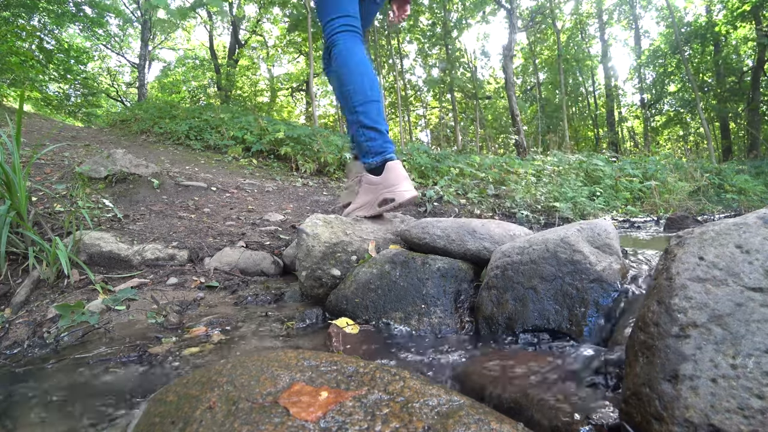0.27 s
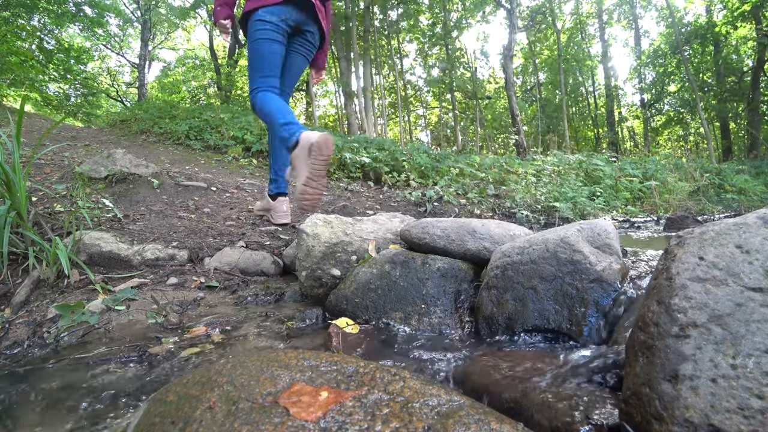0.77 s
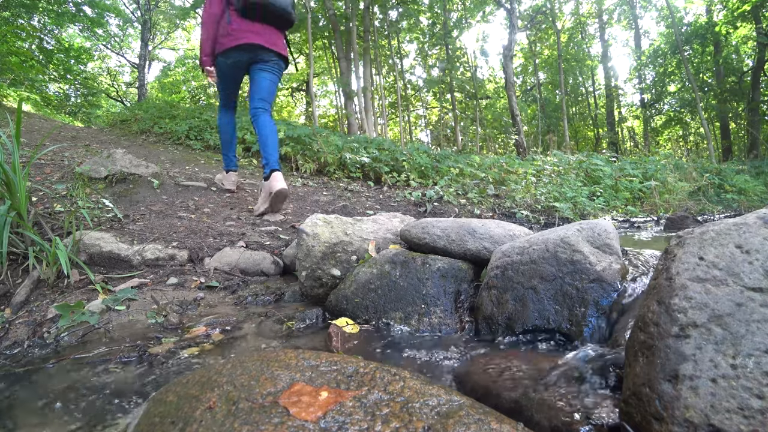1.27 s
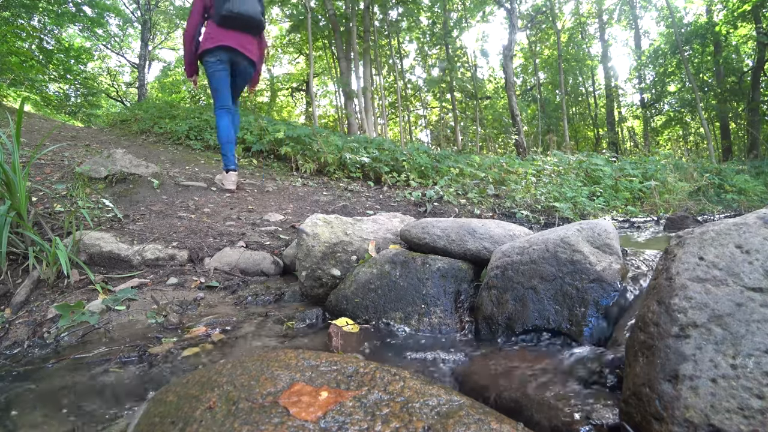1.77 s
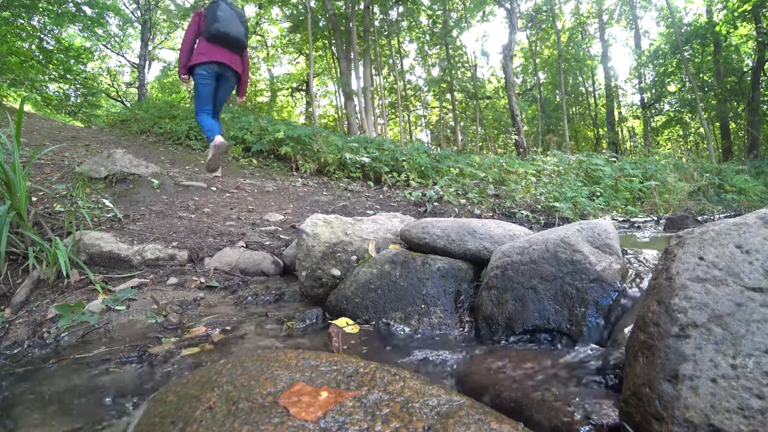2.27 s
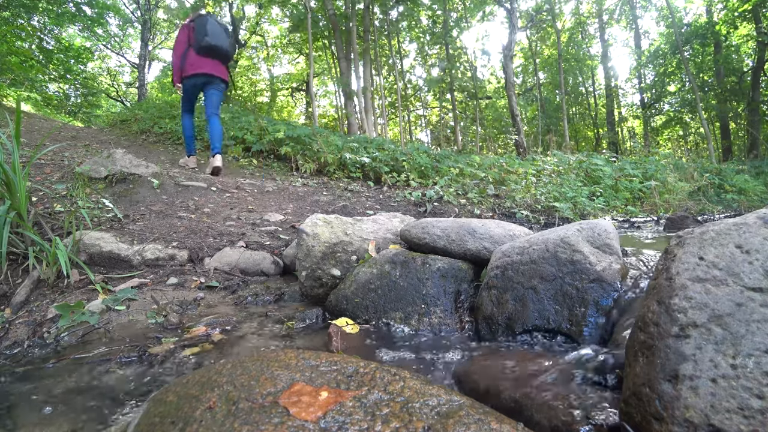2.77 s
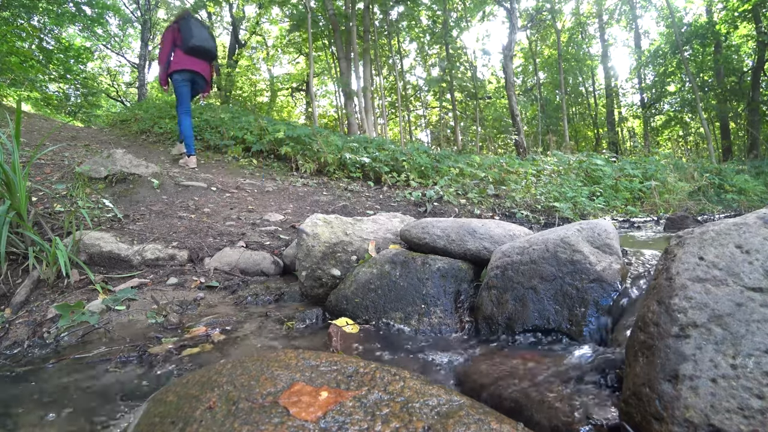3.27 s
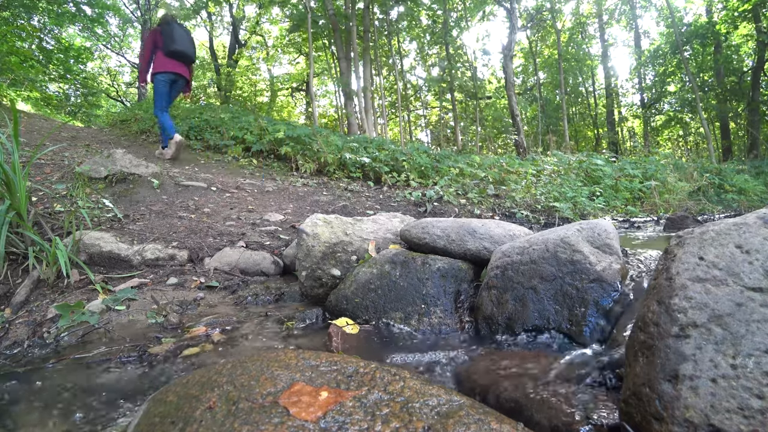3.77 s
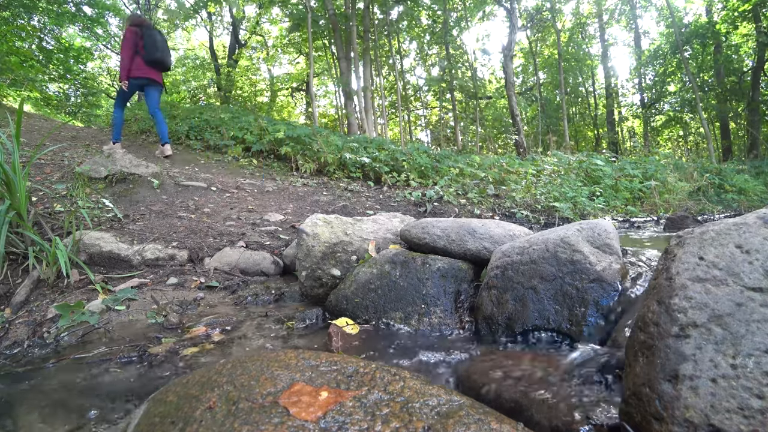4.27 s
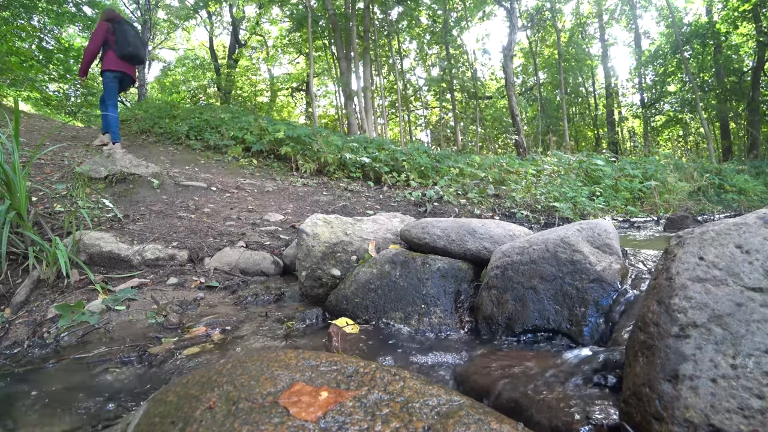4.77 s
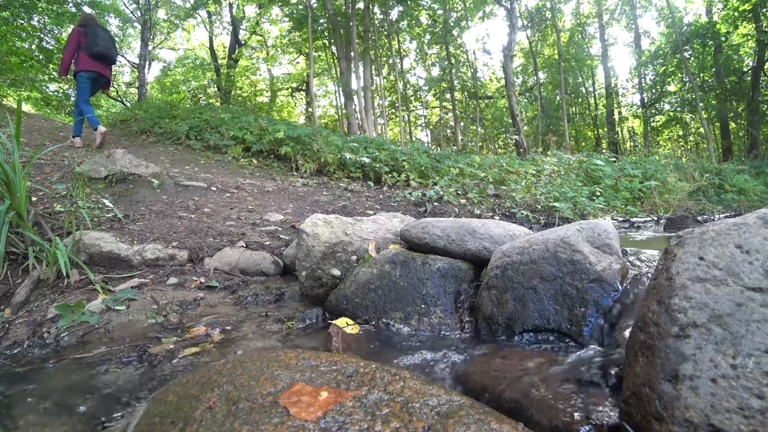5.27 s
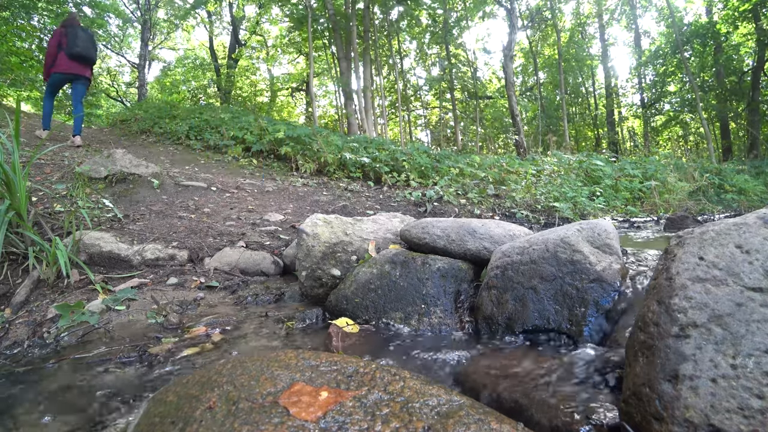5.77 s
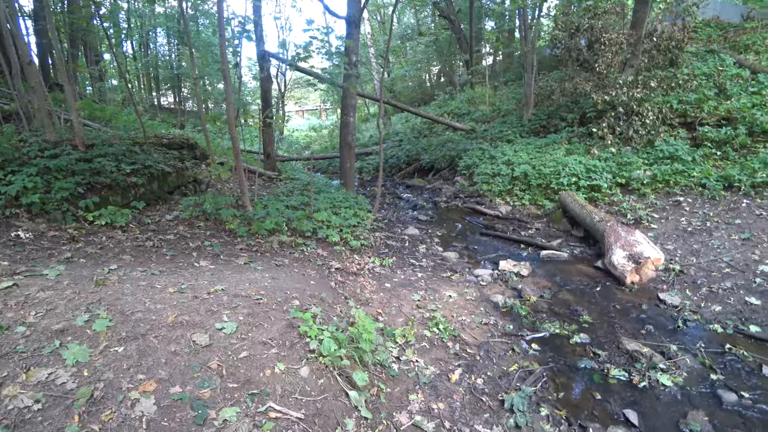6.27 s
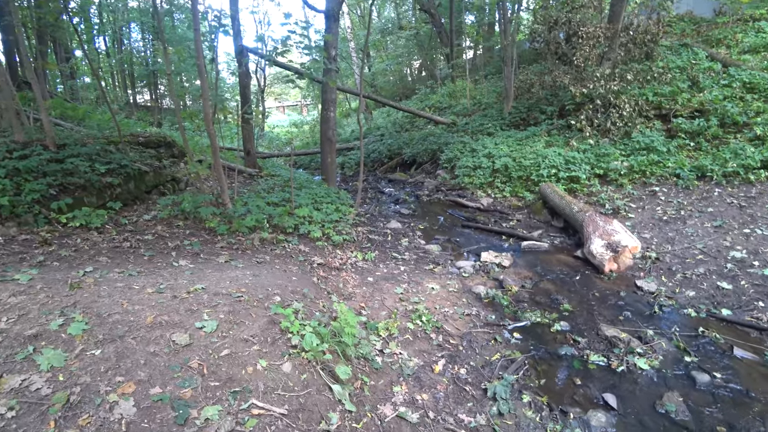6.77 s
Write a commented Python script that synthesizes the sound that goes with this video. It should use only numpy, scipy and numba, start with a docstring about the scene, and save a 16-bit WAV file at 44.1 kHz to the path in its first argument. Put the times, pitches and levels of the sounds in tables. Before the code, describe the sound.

A small microphone sits right at the water among stones. Lively, high, glassy plips and fine fizzing trickle run continuously, dotted with low short gurgles and sharp ticks, over a very faint droning far engine. After six seconds the sound drops abruptly to a wide, dull, steady hush of far traffic and leaves, with faint low rumble and a few light drips from the now distant stream. No footsteps are heard.

```python
"""Forest stream beside the listener, then up the bank

A thin stream trickles over stones close by, a little to the right: trapped bubbles ring and rise in pitch,
hollow glugs sound, drops tick, stones echo them and a far engine hums. Each bubble is a damped sine.
At MOVE_S the listening place jumps some metres up the bank, where filtered noise gives far traffic hush and
low rumble, with a faint trickle and three drips."""
import sys
import numpy as np
from scipy import signal
from scipy.fft import rfft, irfft
from scipy.io import wavfile
from scipy.ndimage import uniform_filter1d
from numba import njit

SR = 44100
rng = np.random.default_rng(int(sys.argv[2]) if len(sys.argv) > 2 else 0)


def file_out(sig):
    """Save sig as 16-bit WAV at sys.argv[1]."""
    # one column per channel
    cols = np.atleast_2d(sig).T
    # limit, then scale
    lim = np.clip(cols, -1, 1)
    pcm = np.round(lim * 32767).astype(np.int16)
    wavfile.write(sys.argv[1], SR, pcm)


N = 310023
MOVE_S = 6.162


def undb(db):
    """Decibels are logarithmic: the amplitude gain of a dB value."""
    return 10 ** (np.asarray(db) / 20)


def level(x, db):
    """Root-mean-square amplitude measures power: scale to an rms level."""
    return x * undb(db) / np.sqrt(np.mean(x ** 2))


def curve(table, axis):
    """Linear interpolation in time: one column of a time table at every sample."""
    rows = np.array(table)
    return np.interp(np.arange(N) / SR, rows[:, 0], rows[:, axis])


def colour(table, hz):
    """Interpolation over log frequency: dB of a spectrum table at these frequencies."""
    rows = np.array(table)
    return np.interp(np.log(hz), np.log(rows[:, 0]), rows[:, 1])


def walk(rate):
    """Slow random modulation: levels held 1 / rate s and slewed twice; spread near 1."""
    k = int(SR / rate)
    held = np.repeat(rng.standard_normal(N // k + 1), k)
    return 1.98 * uniform_filter1d(uniform_filter1d(held, k), k)[:N]


PARK_DB = -42  # before the gain of either listening place
# Spectral density of the park's hush; columns: frequency_hz [Hz], level_db [dB per Hz, relative]
PARK_SPECTRUM = [(18, -3), (30, 2), (60, 3), (140, -7.5), (230, -12), (600, -10), (850, -9), (1050, -5.5),
                 (1350, -11), (2200, -17.5), (3200, -18.5), (6000, -26.5), (12000, -32.5), (16000, -29)]


def park():
    """Partly coherent noise: far traffic and leaves, alike left and right in the bass only."""
    hz = np.maximum(np.arange(N // 2 + 1) * SR / N, 10)
    gain = undb(colour(PARK_SPECTRUM, hz))
    side_share = np.clip((hz / 260) ** 2, 0, .6)
    mid = irfft(rfft(rng.standard_normal(N)) * gain, N)
    side = irfft(rfft(rng.standard_normal(N)) * gain * side_share, N)
    return level(np.array([undb(-1.0) * (mid + side), mid - side]), PARK_DB)


def rumble():
    """Band-limited noise: low traffic rumble."""
    band = signal.butter(2, (70, 210), "band", fs=SR, output="sos")
    return level(signal.sosfilt(band, rng.standard_normal(N)), -57.5)


ENGINE_SECOND_DB = -57  # mean level of the octave
HUM_HZ, HUM_DB = 51.6, -53.5  # just below the engine, beating with it; mean level
ENGINE_FADES_PER_S, ENGINE_STEADY = 12, 6.9  # rate of scattered paths; weight of the steady one
# Firing rate of the far engine, before a slight waver; columns: start_s [s], pitch_hz [Hz]
ENGINE_RATE = [(0, 59.1), (2.6, 58.65), (3.6, 54.23), (6.16, 55.4)]
# Its low tone swells and sinks; columns: start_s [s], level_db [dB rms, before path fading]
ENGINE_LEVEL = [(0.1, -52), (0.35, -44), (0.8, -44), (0.9, -56), (1.25, -42), (1.45, -52), (2.4, -44),
                (2.55, -48), (2.7, -40), (2.9, -48), (3.55, -50.5), (3.75, -47), (6.05, -46.5)]


def engine():
    """Multipath fading: a firing tone beats with its scattered paths, beside its octave and a nearby hum."""
    phase = 2 * np.pi * np.cumsum(curve(ENGINE_RATE, axis=1) + 0.18 * walk(8.25)) / SR
    # scattered paths through the trees beat against the steady one
    scattered = walk(ENGINE_FADES_PER_S) + 1j * walk(ENGINE_FADES_PER_S)
    paths = (ENGINE_STEADY + scattered) / np.sqrt(2 + ENGINE_STEADY ** 2)
    firing = undb(curve(ENGINE_LEVEL, axis=1)) * np.imag(paths * np.exp(1j * phase))
    octave = undb(ENGINE_SECOND_DB + 2.1 * walk(9)) * np.sin(2 * phase)
    hum = undb(HUM_DB + 1.2 * walk(2.8)) * np.sin(2 * np.pi * HUM_HZ * np.arange(N) / SR)
    return np.sqrt(2) * (firing + octave + hum)  # sine peak for a given rms


# Resonances of hollows between the stones; columns: pitch_hz [Hz], width_hz [Hz], level_db [dB]
STONE_HOLLOWS = [(512, 74, -12), (905, 140, -9.5), (1620, 140, -10)]


def stones(x):
    """Resonance and diffuse reflection: deep bass drops out, hollows ring along, banks return brief treble."""
    t = np.arange(SR // 8) / SR
    # falls 60 dB in 6.7 ms, different at each ear
    tail = rng.standard_normal((2, len(t))) * np.exp(-np.log(1000) * t / 0.0067)
    tail /= np.sqrt(np.sum(tail ** 2, axis=1, keepdims=True))
    tail = signal.sosfilt(signal.butter(2, 5000, "high", fs=SR, output="sos"), tail)
    # small bubbles radiate no deep bass
    direct = signal.sosfilt(signal.butter(2, 210, "high", fs=SR, output="sos"), x)
    ringing = direct
    for hz, width_hz, db in STONE_HOLLOWS:
        hollow = signal.iirpeak(hz, hz / width_hz, fs=SR)
        ringing = ringing + undb(db) * signal.lfilter(*hollow, direct)
    return ringing + undb(-12.0) * signal.fftconvolve(ringing, tail, axes=1)[:, :N]


@njit
def ring(start, hz, cycles, rise, left, right, length, attack, phase0, overshoot):
    """Damped bubble oscillation: a jolt and strong first swing, then a fade as pitch climbs near the surface."""
    out = np.zeros((2, length))
    for e in range(len(start)):
        phase = phase0
        for i in range(min(int(6 * cycles[e] * SR / hz[e]), length - start[e])):
            turns = i * hz[e] / SR
            phase += 2 * np.pi * min(hz[e] * (1 + rise[e] * turns / cycles[e]) / SR, .45)
            swing = np.exp(-turns / cycles[e]) + overshoot * np.exp(-2 * turns)
            v = swing * (1 - np.exp(-i / attack[e])) ** 2 * np.sin(phase)
            out[0, start[e] + i] += left[e] * v
            out[1, start[e] + i] += right[e] * v
    return out


STONE_ECHO_MS, STONE_ECHO_DB = 2.2, -14  # typical delay, relative level
PINCH_MS, PINCH_PHASE, PINCH_OVERSHOOT = 0.027, 1, 0.053  # sudden start: rise, phase (rad), extra first swing
SWELL = 0.086  # the ring builds up over this share of its fading time beyond two cycles
# Mean place of the stream, below zero to the right; columns: pitch_hz [Hz], left_minus_right_db [dB]
STREAM_PLACE = [(250, 0), (600, -3), (2000, -4.5), (5000, -3), (12000, -2.5)]


def bubbles(s, db, hz, cycles, rise, spread_db, rise_scatter=0.58):
    """Level panning and reflection: a tick, one echo, a weaker lead-in just before, a later companion."""
    chance = rng.standard_normal((len(s), 12)).T
    # the finest droplets scatter wider than the big bubbles
    pan_db = colour(STREAM_PLACE, hz) + spread_db * chance[0] * (1 + (hz / 5000) ** 2)
    now = 0 * s
    delay_s = STONE_ECHO_MS / 1000
    echo = delay_s * np.exp(.5 * chance[1])
    later = delay_s * np.exp(.9 + .6 * chance[2])
    lead_in = delay_s * np.exp(-.4 + .6 * chance[3])
    tick_db = -10.5 + 7.5 * np.clip(chance[9], -3, 1.5)
    tick_hz = np.minimum(3500 + 1.68 * hz, 12000) * np.exp(0.29 * chance[10])
    tick_cycles = 0.98 * np.exp(0.62 * chance[11])
    # rows: bubble, echo, later companion, faint lead-in, tick of the neck pinching off
    lag = np.array([now, echo, later, -lead_in, now])
    drop_db = np.array([now, now + STONE_ECHO_DB, now - 13, now - 15 - 4000 / hz, tick_db])
    pitch = np.array([hz, hz, hz * np.exp(0.131 * chance[4]), hz * np.exp(0.266 * chance[5]), tick_hz])
    ringing = np.clip([cycles, cycles, 0.94 * cycles, cycles, tick_cycles], .3, 30)
    size = undb(db + drop_db) * np.sign(chance[4:9])
    left, right = size * undb(pan_db / 2), size * undb(-pan_db / 2)
    glide = np.tile(rise * np.exp(rise_scatter * chance[8]), len(lag))
    start = np.clip((s + lag) * SR, 0, N - 1).astype(np.int64)
    attack_s = PINCH_MS / 1000 + SWELL * np.maximum(ringing - 2, 0) / pitch
    return ring(start.ravel(), pitch.ravel(), ringing.ravel(), glide, left.ravel(), right.ravel(), N,
                attack_s.ravel() * SR, PINCH_PHASE, PINCH_OVERSHOOT)


# Drips that carry up to the bank; columns: start_s [s], level_db [dB], pitch_hz [Hz]
BANK_DRIPS = [(6.3999, -31, 3180), (6.55, -32, 1300), (6.812, -33, 2850)]


def far_drips():
    """Damped oscillation: single drips ring for a few cycles."""
    s, db, hz = np.array(BANK_DRIPS, float).T
    return bubbles(s, db, hz, 0 * s + 4.9, rise=0.044, spread_db=3.0)


# Loudness of a small bubble by its pitch; columns: pitch_hz [Hz], level_db [dB, relative]
BUBBLE_LOUDNESS = [(220, -22.5), (350, -18), (500, -4.5), (750, -5.5), (1000, 5), (1400, 2), (1800, 9.5),
                   (3000, 14), (4500, 11.5), (6500, 5.5), (8500, 0.5), (10000, 13.5), (14000, -14)]


def swarm(per_s, lo_hz, hi_hz, cycles, scatter_db, surge, rise=0.0607):
    """Random superposition: bunches of many faint small bubbles, a few larger, none huge; rms 1."""
    chance = rng.random((int(per_s * N / SR), 4)).T
    s = chance[0] * (N - 1) / SR
    hz = lo_hz * (hi_hz / lo_hz) ** chance[1]
    size_db = -scatter_db * np.log(chance[2] + 1e-9) + surge[(s * SR).astype(int)]
    db = colour(BUBBLE_LOUDNESS, hz) + np.minimum(size_db, 2.11 * scatter_db)
    ringing = cycles * 2.44 ** (2 * chance[3] - 1)
    return level(bubbles(s, db, hz, ringing, rise, spread_db=1.36), 0)


def trickle():
    """Summed bubble resonances: rings, spray ticks and low gurgles in quick shared spurts, over a fine fizz."""
    spurt = walk(45)
    spurt -= uniform_filter1d(spurt, SR // 14)  # the flow itself is steady
    bed = swarm(760, 218.9, 8985, cycles=3.44, scatter_db=4.0, surge=5.4 * spurt)
    spray = swarm(400, 2850, 14100, cycles=1.08, scatter_db=6.0, surge=3.0 * spurt)
    gurgle = swarm(45, 230, 642, cycles=1.33, scatter_db=5.0, surge=6.7 * spurt)
    fizz = swarm(2500, 1213, 12900, cycles=3.8, scatter_db=7.0, surge=2.5 * spurt)
    # a few bubbles ring long and sweep further upward as they rise
    singers = swarm(70, 416.7, 2472, cycles=5.7, scatter_db=3.0, surge=3.0 * spurt, rise=0.1135)
    # the tiniest bubbles ring briefly at one nearly steady high pitch
    pinpricks = swarm(160, 4440, 12350, cycles=3.7, scatter_db=6.0, surge=5.9 * spurt, rise=0.024)
    low = bed + undb(-13.0) * singers + undb(-14.0) * gurgle
    high = undb(-4.0) * spray + undb(-10.0) * pinpricks + undb(-8.5) * fizz
    return low + high


GLUG_CYCLES, TICK_CYCLES = 0.8, 1.29  # cycles to fade by 1/e
POCKET_DB, POCKET_CYCLES, POCKET_PITCH = -13, 2.9, 1.13  # the air left by a glug rings on, a little higher
DROPS_PER_S, DROPS_DB = 50, -34  # further drops, falling at random
LULL_MS, LULL_DB = 11.4, -1  # the trickle thins while water gathers before each clear sound
# Clearest bubbles, from short blips to long rings;
# columns: start_s [s], level_db [dB], pitch_hz [Hz], fade_cycles [cycles to 1/e]
CLEAR_BUBBLES = [(0.0301, -2.5, 2770, 2.6), (0.1162, -13.5, 1640, 4.9), (0.2015, -12.5, 977, 6.8),
                 (0.2963, -8, 2650, 3.2), (0.337, -18, 1495, 5.4), (0.401, -20, 900, 3.6),
                 (0.4118, -7.5, 3150, 6), (0.4345, -4, 4670, 3.5), (0.5391, -11.5, 1790, 5.3),
                 (0.633, -12, 1006, 4.8), (0.662, -9.5, 1530, 3.9), (0.747, -13, 2230, 6.9),
                 (0.845, 4, 3380, 1.3), (0.854, -14, 1250, 5.5), (0.949, -16, 2090, 4.9),
                 (0.971, -10.5, 4800, 10), (1.0665, -19, 905, 4.5), (1.1341, -3.5, 6100, 2.7),
                 (1.1704, -10, 2150, 5.8), (1.1873, -5.5, 3240, 5.9), (1.2335, -8.5, 3560, 10),
                 (1.234, -19, 930, 4.1), (1.352, -18, 1465, 8.2), (1.4253, -17.5, 947, 8.3),
                 (1.525, -8, 4410, 2.6), (1.5663, -12.5, 1770, 2.8), (1.5872, -1, 2380, 1),
                 (1.6094, -2, 2180, 2), (1.8031, 1, 3200, 1.7), (1.8228, -5, 2190, 3),
                 (1.9452, -2, 3960, 3.4), (1.948, -20, 956, 6.7), (2.0501, -8.5, 1600, 2.9),
                 (2.072, -8.5, 3050, 5.5), (2.1241, -4, 2580, 5), (2.169, -14, 3070, 7.2),
                 (2.1875, -11, 4780, 5), (2.2265, -16, 2120, 9.7), (2.2831, -10.5, 3130, 9.6),
                 (2.307, -22, 1760, 4.6), (2.3255, -15, 5000, 6.2), (2.3539, -4.5, 3200, 8.6),
                 (2.362, -22, 840, 2), (2.4468, -4.5, 3900, 2.2), (2.4732, -3.5, 3300, 4.6),
                 (2.5261, -6, 3900, 7.5), (2.6244, -12, 1360, 5.6), (2.66, -13, 2330, 6.2),
                 (2.716, -20.5, 860, 4.2), (2.779, -16, 2040, 3.9), (2.8983, -19.5, 915, 5.2),
                 (2.994, -21, 1000, 4), (3.016, -17, 1050, 2.5), (3.0563, 1, 3760, 1.6),
                 (3.0857, -18, 1670, 13), (3.2132, -10, 2620, 6.1), (3.2333, 3.5, 2830, 2),
                 (3.3013, -3, 3180, 8.1), (3.332, -22, 1390, 3.6), (3.368, -24, 1620, 13),
                 (3.384, -3, 3200, 1.1), (3.398, -10.5, 4140, 7.5), (3.4014, -4, 2760, 12),
                 (3.481, -12, 1670, 4.9), (3.5753, -4.5, 3200, 2.3), (3.6018, -8, 2900, 3.4),
                 (3.6605, -16, 1810, 12), (3.6929, 0, 3300, 6.9), (3.759, -12.5, 1750, 4.3),
                 (3.8795, -9, 2740, 14), (3.9256, -4.5, 2960, 2.6), (3.9782, -8.5, 2120, 4.1),
                 (3.993, -11.5, 1720, 6.7), (4.0543, -1.5, 2700, 3.6), (4.0813, -3.5, 3160, 2.6),
                 (4.1238, -11.5, 930, 2.4), (4.1868, -9, 966, 3.1), (4.2315, -4.5, 2240, 4.3),
                 (4.2716, -10, 3710, 6), (4.3292, -9, 3130, 6.4), (4.387, -19, 1006, 7.5),
                 (4.3972, -3.5, 4400, 4), (4.4082, -1.5, 4950, 2.5), (4.419, -7.5, 2180, 5.1),
                 (4.445, -15.5, 820, 2.3), (4.456, -22, 900, 10), (4.4826, -20, 1077, 12),
                 (4.5, -26, 493, 7.6), (4.5298, -8.5, 1630, 3.5), (4.408, -11, 2100, 4.4),
                 (4.564, -18, 1300, 6.7), (4.5647, -5, 3500, 3.3), (4.6168, -16, 1060, 4.7),
                 (4.6329, -9.5, 478, 1.9), (4.726, -10, 2320, 2.8), (4.8047, -2, 4670, 1.8),
                 (4.829, 1, 3290, 4), (4.898, -20, 1030, 3.6), (4.9543, -2, 3590, 2.6),
                 (4.9629, -6, 3500, 2.4), (4.97, -20, 1630, 13), (5.005, -13.5, 1190, 1.6),
                 (5.117, -15, 1940, 2.7), (5.148, -14.5, 1620, 3), (5.1769, -1.5, 2970, 2.1),
                 (5.3422, -12.5, 2110, 8.2), (5.365, -19.5, 1576, 7.5), (5.41, -22, 1940, 4.3),
                 (5.4226, -11.5, 2700, 6.2), (5.448, -21.5, 1095, 7.7), (5.4722, -6.5, 4800, 5.1),
                 (5.5667, -7.5, 4490, 11), (5.7054, -13, 982, 5.2), (5.77, -10, 1910, 3.5),
                 (5.783, -13, 2350, 13), (5.7864, -10, 1250, 2.3), (5.8345, -1.5, 2830, 4.1),
                 (5.858, -1.5, 3100, 4.4), (5.9153, -5.5, 1970, 2.5), (5.9361, -13.5, 1390, 7.1),
                 (5.928, -6, 2740, 3.5), (5.9741, -11.5, 2200, 3.6), (5.9953, -7, 3720, 6.9),
                 (6.0056, -5.5, 4000, 2.2), (6.0745, -13.5, 2280, 9.6), (6.11, -15.5, 2440, 6),
                 (6.116, -10, 2970, 10), (6.1235, -13, 1950, 6.5)]
# Hollow glugs of air pockets closing under a stone; columns: start_s [s], level_db [dB], pitch_hz [Hz]
HOLLOW_GLUGS = [(0.202, -12, 540), (0.3274, -14.5, 453), (0.631, -14.5, 380), (0.679, -12, 570),
                (0.807, -16, 390), (0.8385, -18, 600), (0.9126, -12, 600), (0.9625, -15.5, 356),
                (1.008, -13.5, 534), (1.2867, -10, 850), (1.341, -16, 336), (1.459, -20, 500),
                (1.593, -15, 302), (1.711, -20, 310), (1.79, -10, 395), (1.908, -19, 483),
                (2.1547, -16, 580), (2.176, -20, 353), (2.4378, -23, 373), (2.477, -19, 406),
                (2.5289, -19.5, 387), (2.8624, -13.5, 537), (2.9589, -17.5, 533), (3.4753, -17.5, 540),
                (3.309, -24, 547), (3.335, -21, 400), (3.52, -16, 596), (3.5607, -13.5, 328),
                (3.789, -13.5, 563), (4.645, -14, 458), (4.659, -10, 630), (4.73, -21, 470),
                (4.862, -19, 454), (5.083, -15.5, 500), (5.127, -23.5, 450), (5.218, -17.5, 520),
                (5.251, -17, 420), (5.301, -21.5, 486), (5.453, -18.5, 573), (5.516, -12.5, 686),
                (5.605, -20, 447), (5.683, -15, 416), (5.7369, -8, 670), (5.79, -18.5, 520),
                (5.814, -18, 527), (5.862, -20.5, 343), (5.9263, -11.5, 422), (6.0554, -10.5, 500),
                (6.118, -21.5, 270)]
# Sharp ticks of drops landing; columns: start_s [s], level_db [dB], pitch_hz [Hz]
DROP_TICKS = [(0.2287, -4.5, 1520), (0.2925, 0.5, 2600), (0.418, 3, 7080), (0.51, 2.5, 8100),
              (0.552, -1, 5460), (0.636, 7, 3060), (0.8384, 5, 3380), (0.954, 1.5, 6500), (1.2343, 3, 4470),
              (1.774, -5.5, 1600), (1.873, 1, 5000), (1.962, -2.5, 2500), (2.018, -1, 3750),
              (2.168, -5.5, 5000), (2.2107, -1, 2540), (2.2246, -7, 5000), (2.4552, 6, 7140),
              (2.7155, -8, 1840), (2.8283, 1.5, 3000), (2.9462, -2.5, 2000), (3.0454, -2, 10300),
              (3.0766, -3.5, 2330), (3.107, 1, 6200), (3.1323, -5.5, 1300), (3.251, -1, 5530),
              (3.681, 1, 9340), (3.734, 4.5, 7900), (3.932, 1, 2330), (4.0861, 6.5, 3440),
              (4.2018, 6, 5060), (4.204, 0, 1870), (4.2762, 0, 6000), (4.3361, -6, 4160), (4.47, 1.5, 7400),
              (4.6005, 6, 5600), (4.696, 4, 8950), (4.8567, 0, 5100), (4.9925, -2, 2300),
              (5.024, 2.5, 3920), (5.368, -3, 6070), (5.448, 1, 4370), (5.6366, 1, 2000), (5.6617, 0, 5000),
              (5.6968, -1, 2420), (5.72, -3.5, 2300), (5.901, -3, 3680), (6.053, 1.5, 6700),
              (6.07, -1, 10480)]


def splashes():
    """Damping sets character: glugs and ticks die fast, most bubbles ring; also returns the thinning before."""
    rows = list(CLEAR_BUBBLES)
    rows += [(s, db, hz, GLUG_CYCLES) for s, db, hz in HOLLOW_GLUGS]
    rows += [(s, db, hz, TICK_CYCLES) for s, db, hz in DROP_TICKS]
    rows += [(s, db + POCKET_DB, POCKET_PITCH * hz, POCKET_CYCLES) for s, db, hz in HOLLOW_GLUGS]
    s, db, hz, cycles = np.array(rows, float).T
    drops = swarm(DROPS_PER_S, 2610, 8400, cycles=1.26, scatter_db=3.0, surge=np.zeros(N), rise=0.047)
    width = int(LULL_MS * SR / 1000)
    gathering = np.zeros(N)
    gathering[np.maximum((s * SR).astype(int) - width // 2, 0)] = width
    # smoothing spreads each mark over the time just before its sound, with soft edges
    thinning = uniform_filter1d(uniform_filter1d(gathering, width), SR // 500)
    lull_db = LULL_DB * np.minimum(thinning, 1)
    clear = bubbles(s, db, hz, cycles, rise=0.012, spread_db=0.5, rise_scatter=0.59)
    return clear + undb(DROPS_DB) * drops, lull_db


TRICKLE_DB, FAR_TRICKLE_DB = -29, -57  # gain by the water, up on the bank
PARK_BY_WATER_DB = -5.5  # gain of the hush by the water


def scene():
    """Superposition of sources: close by the water until the move, then up on the bank."""
    bed, hush = trickle(), park()
    clear, lull_db = splashes()
    water = clear + undb(TRICKLE_DB + lull_db) * bed
    near = stones(water) + engine() + undb(PARK_BY_WATER_DB) * hush
    far_water = stones(undb(FAR_TRICKLE_DB) * bed + far_drips())
    far = undb(1.4 * walk(14)) * hush + rumble() + far_water
    moved = np.clip((np.arange(N) / SR - MOVE_S) / 0.00038, 0, 1)  # crosses over in 0.38 ms
    return (1 - moved) * near + moved * far


MIC_DIP_HZ, MIC_DIP_WIDTH_HZ, MIC_DIP_DEPTH = 8660, 880, 0.34  # dip in the response, depth 0-1
SELF_NOISE_DB, TOP_HZ = -63, 15900  # hiss before the top cut, edge of that cut


def record(dry):
    """Saturation and band limits: a small microphone rounds peaks, dips and fades in the treble, hisses."""
    rounded = np.tanh(1.446 * dry) / 1.698
    soft = signal.sosfilt(signal.butter(2, 11500, fs=SR, output="sos"), rounded)
    dip = signal.lfilter(*signal.iirpeak(MIC_DIP_HZ, MIC_DIP_HZ / MIC_DIP_WIDTH_HZ, fs=SR), soft)
    hiss = undb(SELF_NOISE_DB) * rng.standard_normal(dry.shape)
    heard = soft - MIC_DIP_DEPTH * dip + hiss
    return signal.sosfilt(signal.ellip(10, .2, 80, TOP_HZ, fs=SR, output="sos"), heard)


dry = scene()
out = record(dry)
file_out(out)
```